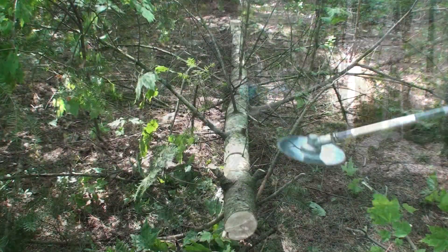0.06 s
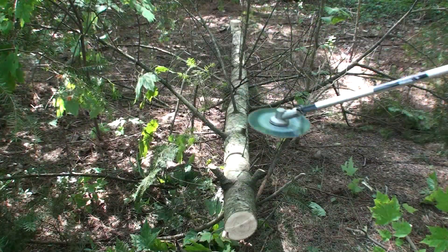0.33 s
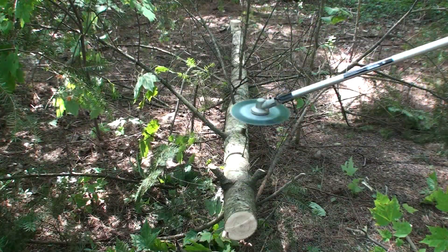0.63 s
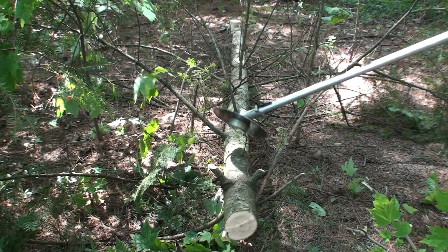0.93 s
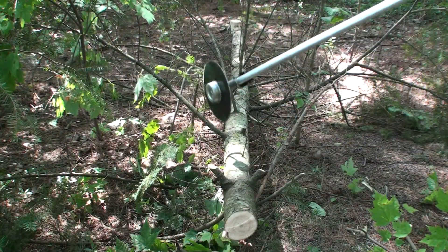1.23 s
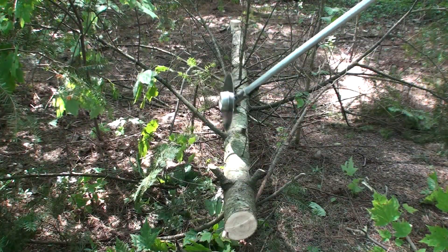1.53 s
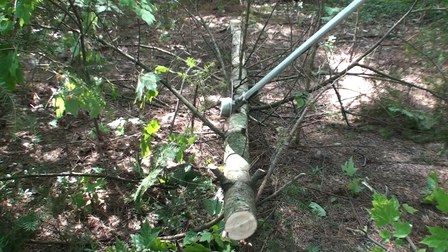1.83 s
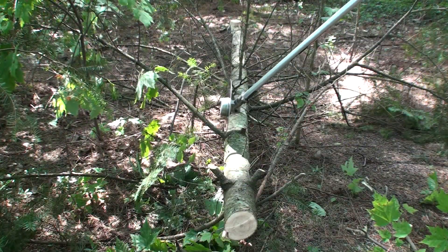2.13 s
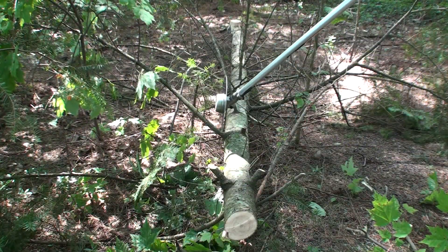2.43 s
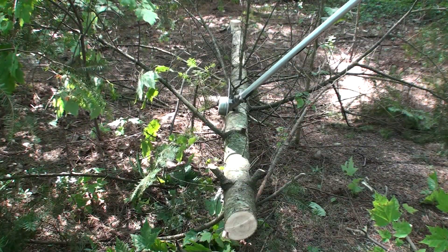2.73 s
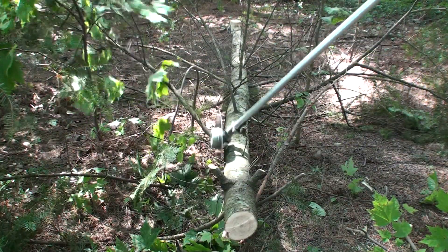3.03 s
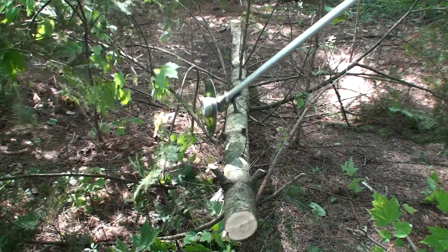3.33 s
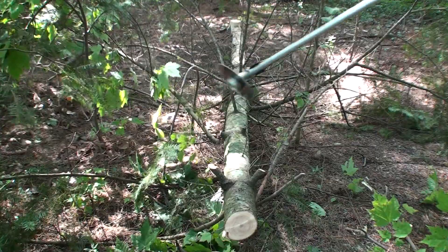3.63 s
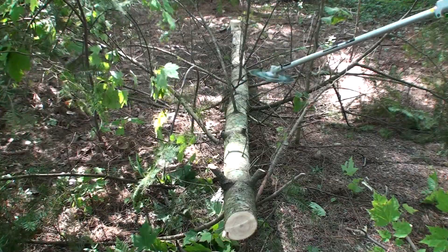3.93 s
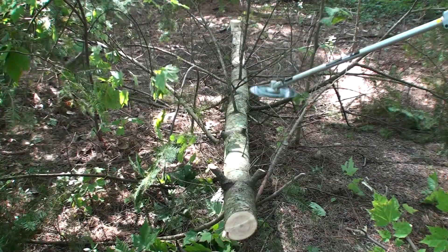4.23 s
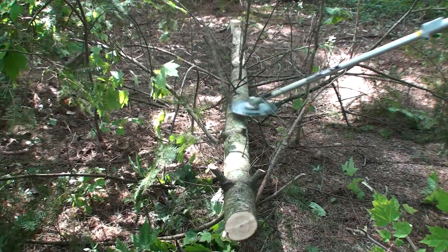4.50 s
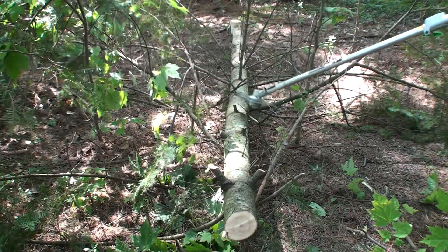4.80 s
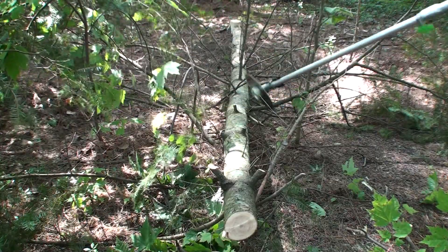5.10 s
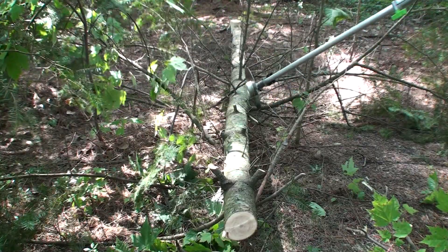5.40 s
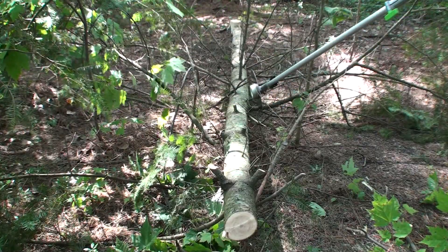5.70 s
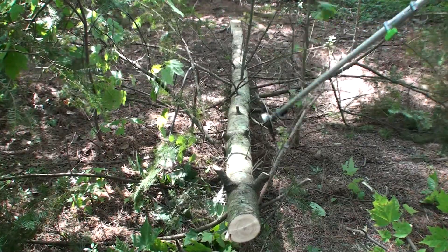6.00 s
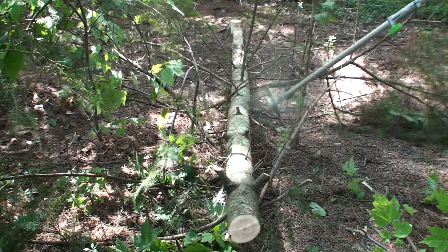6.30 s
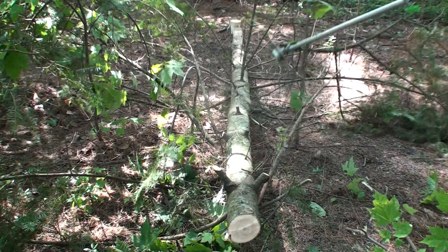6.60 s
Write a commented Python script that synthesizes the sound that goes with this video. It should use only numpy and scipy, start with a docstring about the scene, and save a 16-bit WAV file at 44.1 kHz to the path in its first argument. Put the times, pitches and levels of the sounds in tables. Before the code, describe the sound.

A cordless brushcutter runs throughout, its steel saw blade rushing and whistling over a motor and gear whine as it takes branches off a trunk outdoors. A few brief nicks come first, then the whine sags and climbs again. A harder bite follows, then a flurry of rasping cuts with snapping fibres, high squeals and metallic ringing, and a few last bites that pull the pitch down. The sound sits slightly to the right.

```python
"""Brushcutter limbing a trunk

A cordless brushcutter with a steel saw blade takes the branches off a felled trunk in a wood.
The blade rushes and whistles in the air over the whine of motor and bevel gear. At each bite the
teeth rasp through wood, fibres snap, and the disc squeals and rings on; the speed sags at some cuts.
Underneath: a faint low hum that stops part way, and a hollow drone that comes and goes."""
import sys
import numpy as np
from scipy import signal
from scipy.fft import rfft, irfft
from scipy.io import wavfile
from scipy.ndimage import uniform_filter1d, minimum_filter1d

SR = 44100
rng = np.random.default_rng(int(sys.argv[2]) if len(sys.argv) > 2 else 0)


def dump_mix(stems):
    """Bounce the given channels to the path in sys.argv[1] as a 16-bit WAV at rate SR."""
    frames = np.atleast_2d(stems).T  # one column per channel
    limited = np.clip(frames, -1, 1)  # hard clip at full scale
    pcm = np.round(limited * 32767).astype(np.int16)
    wavfile.write(sys.argv[1], SR, pcm)


N = 297660
T = np.arange(N) / SR
GEAR_RATIO, TEETH, NOMINAL_HZ = 29 / 12, 20, 280

# Motor speed: (time [s], rotation [Hz])
MOTOR_SPEED = [(0, 281.7), (1.3, 233.6), (1.5, 230.8), (1.75, 232.2), (2.04, 241.6), (2.41, 260.3),
               (2.92, 290.9), (2.99, 277), (3.2, 290.4), (3.53, 306.8), (3.8, 312.6), (4.1, 317.6),
               (4.4, 309), (4.62, 298.8), (5.2, 291.8), (5.89, 290.9), (6.01, 267.2), (6.25, 277.3),
               (6.39, 251.3), (6.75, 236.1)]
# Stereo balance of broad noise: (frequency [Hz], left minus right [dB])
BALANCE = [(60, 0), (130, -1), (260, -1), (500, -4), (1300, -5), (2400, -4), (4400, -3), (8000, 0),
           (15000, -0.3)]
# Stereo likeness of broad noise: (frequency [Hz], coherence [0..1])
COHERENCE = [(60, 0.99), (130, 1), (290, 0.97), (640, 0.89), (1410, 0.99), (3100, 0.87), (6820, 0.91),
             (15000, 0.93)]
# Air torn by the blade; colour shifts as the disc tilts: (time [s], level [dB], hiss [dB], top [dB])
RUSH_LEVELS = [(0, -35, -1, 3), (.25, -32.5, 2.5, 5.5), (.55, -30.5, 1, 4.5), (.75, -32.5, 4.5, 4),
               (.9, -32, -1, 0.5), (1.2, -32.5, 2.7, 3.5), (1.65, -33.5, 3, 3), (2.1, -33, 5, 2.5),
               (2.9, -32.5, 3.5, 4), (3.3, -32, 4, 4), (3.6, -33, 2.5, 8.5), (3.8, -29.5, -1, 1.5),
               (4.07, -30.5, -2.5, 2.5), (4.22, -37.5, -4, 12.5), (4.75, -37, .5, 3.5),
               (5.3, -36, -1.5, 2.5), (6.1, -34.5, -0.5, -1), (6.75, -35.5, -.5, -1.5)]
# Rush spectrum at nominal speed: (frequency [Hz], relative density [dB])
RUSH_SPECTRUM = [(30, -33), (100, -3), (180, -11.5), (260, -3), (450, 3.5), (1000, 7), (1400, 11.5),
                 (2000, 8.5), (2350, 8), (2900, 8), (3500, 7), (4700, 10.5), (6000, 7.5), (7500, 1),
                 (11500, -7.5), (16000, -17.5)]
# Humps in the rush at nominal speed: (centre [Hz], width [Hz], gain [dB])
RUSH_HUMPS = [(240, 22, 5.5), (1510, 100, 1.5), (1990, 104, 3.5), (2520, 160, -1.5), (3630, 110, 1.5),
              (12800, 850, 1.5)]
# Fine hiss spectrum: (frequency [Hz], relative density [dB])
HISS_SPECTRUM = [(11000, -30), (12400, -5), (13000, 3), (14000, -1), (16000, -12)]
# Drive, loudest in the gear on run-up: (time [s], motor order 1 [dB], motor order 2 [dB], gear [dB])
DRIVE_LEVELS = [(0, -38, -56, -39), (.9, -42.5, -54, -46), (1.2, -41.5, -39, -39),
                (1.45, -44.5, -45, -42.5), (2, -41.5, -42, -29.5), (3.1, -44.5, -36.5, -27),
                (3.55, -42.5, -38.5, -30.5), (4.05, -36, -62, -32.5), (4.25, -47, -55, -37),
                (5.05, -44, -44, -41.5), (5.35, -57, -47, -40.5), (6.75, -44.5, -46, -40)]
# Gear mesh and side tones: (multiple of blade speed, relative level [dB])
GEAR_ORDERS = [(1, -26), (4, -23), (6, -28), (9, -12), (12, -7), (15, -2.5), (17, -8), (27, -5), (28, -0.5),
               (29, -3), (30, -0.5), (31, -7.5), (32, -2), (33, -11), (34, -1.5), (36, -12)]
# Shaft and bearing growl: (multiple of motor speed, level re rush [dB])
SHAFT_ORDERS = [(1.37, -19), (1.655, -18.5), (2.48, -17), (2.61, -21), (2.83, -42), (3, -16.5), (5, -7),
                (6.62, -8), (7.04, -8), (7.24, -6.5)]
# Resonant motor orders: (order, resonance [Hz], width [Hz], peak re gear [dB], floor re gear [dB])
RESONANT_ORDERS = [(10, 2310, 81, 10.5, -10), (10, 2910, 37, -6, -16), (40, 10680, 250, 0, -19)]
# Teeth in wood; a light touch lets the disc ring, a deep cut damps it:
# (start [s], end [s], rasp [dB], grind re rasp [dB], ring feed gain [dB])
CUTS = [(0, .06, -19.5, -6.5, -0.5), (.183, .211, -17.5, -7, 1.5), (.997, 1.038, -26.5, -10, -1),
        (1.132, 1.136, -11, -19, 1), (2.92, 3.019, -13.5, -2.5, -2), (3.033, 3.12, -27.5, 2, -3),
        (3.154, 3.233, -22, 6, -3.5), (3.857, 3.896, -14.5, -18, 1), (3.9, 4.079, -26, -2, 0.5),
        (4.078, 4.283, -17.5, -10, 0.5), (4.31, 4.34, -14.5, -5, 2.5), (4.38, 4.442, -17, -7.5, 2),
        (4.448, 4.522, -21, -3, 2.5), (4.54, 4.612, -21, -7, 4), (4.656, 4.68, -28, -6, 4),
        (4.911, 4.964, -19.5, -2.5, -2.5), (5.134, 5.182, -16.5, -5, 2), (5.899, 5.994, -16, -4, -2),
        (6.258, 6.316, -20, 1.5, -0.5), (6.313, 6.369, -16.5, -6, 0), (6.37, 6.377, -14.5, -0.5, -5.5),
        (6.447, 6.454, -12, -5, -3), (6.47, 6.488, -17.5, 2.5, -1)]
# High rasp filter: (frequency [Hz], gain [dB])
RASP_SPECTRUM = [(300, -47), (1500, -38), (3000, -13), (5000, 0), (6500, 6), (7700, 4), (8500, 6),
                 (9700, -0.5), (11500, 1.5), (13000, -10), (16000, -10)]
# Low grind filter: (frequency [Hz], gain [dB])
GRIND_SPECTRUM = [(100, -31), (700, -54), (1150, 6.5), (1600, 13), (2250, 11.5), (3400, -0.5), (5000, -2),
                  (9000, -52)]
# Steel disc modes at nominal speed: (frequency [Hz], relative level [dB], t60 [s])
DISC_MODES = [(1114, -12, 0.18), (2180, 0, 0.23), (2600, -7, 0.26), (2736, -0.5, 0.31), (3386, 0, 0.22),
              (3730, -42, .3), (4220, 2, 0.35), (4790, -5.5, 0.45), (5144, 1, 0.4), (5255, -2, 0.73),
              (5710, -3.5, 0.46), (6150, 3.5, 0.72), (6440, -26, .4), (6740, 0.5, 0.62), (7500, -18, 0.42),
              (7810, 0.5, 0.69), (7900, -30, .5), (8290, 2.5, 0.17), (8530, 2, 0.68), (8680, -2, 0.062),
              (9190, -2, 0.39), (10170, -12, 0.15), (10730, -7.5, 0.11), (11500, -23, .25),
              (12400, -16.5, 0.18)]
# Edge tones, a high and a low note: (start [s], end [s], nominal pitch [Hz], relative level [dB])
EDGE_TONES = [(.04, 0.334, 5326, -12.5), (1.09, 1.37, 4490, -19.5), (1.45, 1.51, 4490, -15.5),
              (1.66, 1.68, 4490, -15), (2.06, 2.21, 4490, -19), (2.288, 2.639, 4495, -12.5),
              (2.751, 2.922, 4505, -20), (3.329, 3.446, 5333, -21.5), (3.545, 3.637, 5333, -14.5),
              (5.419, 5.7, 4475, -36), (5.457, 5.814, 5333, -18)]
# Rubbing wood locks onto one disc tone: (peak time [s], swell [s], pitch [Hz], peak level [dB])
SQUEAL_TONES = [(.217, .03, 8296, -21), (1.148, .016, 8170, -18.5), (2.928, .024, 2430, -17),
                (2.98, .02, 5750, -11), (3.098, .09, 1800, -16.5), (3.183, .025, 2720, -18),
                (4.026, .025, 6390, -15.5), (4.141, .045, 7770, -12), (4.22, .1, 5240, -17),
                (4.295, .1, 6320, -7), (4.33, .08, 5530, -18), (4.345, .12, 6594, -16),
                (4.37, .12, 7734, -16.5), (4.421, .032, 7500, -13), (4.444, .07, 8450, -11),
                (4.45, .02, 9249, -13.5), (4.5, .06, 3785, -16), (4.52, .057, 4580, -18),
                (4.52, 0.053, 5270, -19), (4.558, .025, 6320, -9), (4.61, 0.18, 6300, -19.5),
                (4.92, .012, 2484, -20.5), (5.168, 0.017, 2204, -20), (5.183, .027, 4260, -21),
                (5.198, 0.026, 8080, -17.5), (5.271, .07, 6230, -20.5), (5.28, .12, 6780, -19.5),
                (5.927, 0.03353, 4242, -19.5), (5.989, .054, 1114, -21), (6.015, 0.0196, 2710, -20),
                (6.026, .073, 2211, -16.5), (6.286, .026, 2194, -16), (6.296, .028, 6690, -20),
                (6.484, 0.021, 8926, -18)]
# Hollow drone: (start [s], end [s], level [dB])
DRONE_SPANS = [(3.597, 3.781, -37.5), (5.271, 5.8, -43)]


def amp(db):
    """Decibels to gain."""
    return 10 ** (np.asarray(db) / 20)


def unit_rms(x):
    """Scales to rms 1."""
    return x / np.sqrt(np.mean(x ** 2) + 1e-20)


def track(rows, t=T):
    """Table columns interpolated at times t."""
    times, *columns = np.transpose(rows)
    return [np.interp(t, times, column) for column in columns]


def at_hz(points, hz):
    """Curve interpolated over log frequency."""
    knots_hz, values = np.transpose(points)
    return np.interp(np.log(hz + 1), np.log(knots_hz + 1), values)


def colour(x, spectrum_db):
    """Filters x by a spectrum."""
    return irfft(rfft(x) * amp(at_hz(spectrum_db, np.fft.rfftfreq(N, 1 / SR))), N)


def wander(per_s):
    """Random curve, rms 1, per_s new values a second."""
    values = rng.standard_normal(8192)
    return unit_rms(np.interp(T * per_s, np.arange(len(values)), values))


def tone(hz):
    """Sine of rms 1 along a pitch curve."""
    return np.sqrt(2) * np.sin(2 * np.pi * (np.cumsum(hz) / SR + rng.random()))


def gate(t, start, end, rise_s, fall_s):
    """Linear rise around start, exponential fall after end."""
    return np.clip((t - start) / rise_s + .5, 0, 1) * np.exp(-np.maximum(t - end, 0) / fall_s)


def swell(start, end, build_db_per_s, fade_db_per_s):
    """Builds up to start, holds, fades after end."""
    return amp(-build_db_per_s * np.maximum(start - T, 0) - fade_db_per_s * np.maximum(T - end, 0))


def pan(x, left_db):
    """Mono to stereo; left_db is left minus right."""
    return x * amp([[left_db / 2], [-left_db / 2]])


def spread(x):
    """Mono to broad stereo: leans right, with a little random-phase scatter."""
    hz, _, bins = signal.stft(x, SR, nperseg=512)
    coherence = at_hz(COHERENCE, hz)[:, None]
    scatter = bins * np.exp(2j * np.pi * rng.random(bins.shape)) * np.sqrt(1 - coherence)
    lean = amp(at_hz(BALANCE, hz) / 2)[:, None]
    sides = np.array([(bins + scatter) * lean, (bins - scatter) / lean])
    return signal.istft(sides, SR, nperseg=512)[1][:, :N]


def blade_rush(motor_hz, throb=.105):
    """Rim turbulence: the spectrum slides with speed, the level throbs once a turn."""
    hz, t, noise = signal.stft(rng.standard_normal(N), SR, nperseg=1024, noverlap=768)
    body = (hz > 330) & (hz < 1050)
    hz = hz[:, None]
    level_db, hiss_db, top_db = track(RUSH_LEVELS, t)
    pace = track(MOTOR_SPEED, t)[0] / NOMINAL_HZ
    slide = pace ** .45
    humps_db = sum(db * np.exp(-.5 * ((hz / pace - f) / width) ** 2) for f, width, db in RUSH_HUMPS)
    shape = amp(at_hz(RUSH_SPECTRUM, hz / slide) + humps_db)
    shape /= np.sqrt((shape[body] ** 2).sum(0) / len(hz))
    # the disc beams its treble as it tilts
    beam_db = hiss_db * at_hz([(1100, 0), (1700, .45), (3000, .92), (4200, 1), (6200, 0)], hz)
    beam_db += top_db * at_hz([(4200, 0), (6200, 1), (9000, 1), (15000, .039)], hz)
    beam_db -= 24 * np.log10(slide) * at_hz([(3000, 0), (7000, .3)], hz)
    patches = uniform_filter1d(rng.standard_normal(noise.shape), 10, axis=0)
    patches_db = unit_rms(uniform_filter1d(patches, 10, axis=1))
    bins = noise * shape * amp(level_db + beam_db + patches_db)
    air = signal.istft(bins, SR, nperseg=1024, noverlap=768)[1][:N]
    return spread(air * (1 + throb * tone(motor_hz / GEAR_RATIO)))


def fine_hiss(gear_db, peak_db=-37):
    """High hiss that swells with the gear whine."""
    hiss = unit_rms(colour(rng.standard_normal(N), HISS_SPECTRUM))
    return pan(amp(peak_db + .86 * (gear_db - gear_db.max())) * hiss, -.5)


def drive(motor_hz, flutter=.0012, rough=.39):
    """Motor orders, bevel gear mesh and shaft growl, all on one speed."""
    first_db, second_db, gear_db = track(DRIVE_LEVELS)
    rush_db = track(RUSH_LEVELS)[0]
    hz = motor_hz * (1 + flutter * wander(50))
    motor = amp(first_db - 1) * tone(hz) + amp(second_db) * tone(2 * hz)
    mesh = sum(amp(db) * tone(order * (hz / GEAR_RATIO + .202 * wander(200))) * (1 + rough * wander(60))
               for order, db in GEAR_ORDERS)
    shaft = sum(amp(db) * tone(order * hz + 3 * wander(30)) * (1 + rough * wander(25))
                for order, db in SHAFT_ORDERS)
    return pan(motor * (1 + .14 * wander(40)) + amp(gear_db) * mesh + amp(rush_db) * shaft, -4)


def motor_overtones(motor_hz, gear_db, flutter=.00213, rough=.23):
    """High motor orders flare as the speed carries them through a resonance."""
    out = np.zeros(N)
    for order, centre_hz, width_hz, peak_db, floor_db in RESONANT_ORDERS:
        hz = order * motor_hz
        gain = amp(floor_db) + amp(peak_db) / (1 + (2 * (hz - centre_hz) / width_hz) ** 2)
        out += gain * tone(hz * (1 + flutter * wander(150))) * (1 + rough * wander(100))
    return pan(amp(gear_db) * out, -4)


def tooth_pressure():
    """Envelopes (rasp, grind) of the tooth contact, and of its feed into the disc modes."""
    contact, feed = np.zeros((2, N)), np.zeros((2, N))
    for start, end, rasp_db, grind_db, ring_db in CUTS:
        near = slice(max(int((start - .02) * SR), 0), int((end + .15) * SR))
        push = amp([[rasp_db], [rasp_db + grind_db]]) * gate(T[near], start, end, .0093, .01)
        contact[:, near] = np.maximum(contact[:, near], push)
        feed[:, near] = np.maximum(feed[:, near], push * amp(ring_db))
    return contact, feed


def damped_disc(force, pitch_ratio, width_hz=110, direct=.45):
    """Touched by wood, the disc passes the tooth force through broad modes."""
    pole = np.exp(-np.pi * width_hz / SR)
    warped_s = np.cumsum(pitch_ratio) / SR
    out = direct * force
    for hz, _, _ in DISC_MODES:
        carrier = np.exp(2j * np.pi * hz * warped_s)
        out += 2 * (carrier * signal.lfilter([1 - pole], [1, -pole], force * carrier.conj())).real
    return out


def sawing(motor_hz, rasp, grind, uneven=.15, tooth_set=.59, wobble=.14):
    """Each tooth strikes wood and tears a puff of fibres; teeth are set alternately left and right."""
    turns = np.cumsum(motor_hz * (1 + .004 * wander(200))) / GEAR_RATIO / SR
    teeth = TEETH * turns
    size = np.exp(uneven * rng.standard_normal(N))[(teeth + .5).astype(int)]
    size *= 1 + tooth_set * np.cos(np.pi * teeth)
    strikes = unit_rms(sum(np.cos(2 * np.pi * k * teeth) for k in range(1, 7)))
    tearing = unit_rms(rng.standard_normal(N) * np.exp(-(teeth % 1) / .7))
    force = size * (.5 * strikes + .84 * tearing) * (1 + wobble * np.sin(2 * np.pi * turns))
    steel = damped_disc(force, (motor_hz / NOMINAL_HZ) ** .15)
    bands = colour(steel, RASP_SPECTRUM), colour(steel, GRIND_SPECTRUM)
    # levelled: pressure sets the strength, whichever modes the tooth rate passes
    high, low = (band / np.sqrt(uniform_filter1d(band ** 2, size=1500)) for band in bands)
    return spread((amp(-1.5) * rasp * high + amp(-1) * grind * low) * amp(wander(130)))


def splinters(rasp, per_s=170, gain_db=-13):
    """Dry fibres snap in sharp little cracks while the teeth are in the wood."""
    snaps = rng.choice([-1, 1], N) * (rng.random(N) < per_s / SR)
    crack = rng.standard_normal(200) * np.exp(-np.arange(200) / 30)
    spray = colour(signal.oaconvolve(snaps, crack)[:N], [(500, -28), (1800, -1), (8000, -11), (15000, 1)])
    return pan(amp(gain_db) * rasp * unit_rms(spray), -1)


def disc_ringing(motor_hz, rasp, feed, split_hz=3800, scrape_hz=28, build_s=.0093):
    """Grind feeds the low modes, rasp the high; they rise with speed, smear on wood, then ring free."""
    pole = np.exp(-1 / (build_s * SR))
    high_db, low_db = 20 * np.log10(signal.lfilter([1 - pole], [1, -pole], feed) + 1e-9)
    touch = np.clip(rasp / amp(-16), 0, 1)
    stiffening = (motor_hz / NOMINAL_HZ) ** .17
    out = np.zeros((2, N))
    for hz, db, t60_s in DISC_MODES:
        decay_db = 60 * T / t60_s
        fed_db = low_db - 7 if hz < split_hz else high_db - 12
        held_db = np.maximum.accumulate(fed_db + 3.5 * wander(22) + decay_db) - decay_db
        ring = amp(held_db + db) * tone(hz * stiffening + scrape_hz * touch * wander(400))
        out += pan(ring * (1 + .38 * wander(90)), -.8 + 3 * rng.standard_normal())
    return out


def whistles(motor_hz, split_hz=5000, waver_hz=3.4, unsteady_db=2.5):
    """Edge tones held by the disc: they rise a little with speed and shake with the turbulence."""
    notes = {}
    for start, end, hz, db in EDGE_TONES:
        notes.setdefault(hz > split_hz, []).append((hz, amp(db) * swell(start, end, 90, 73)))
    stiffening = (motor_hz / NOMINAL_HZ) ** .185
    out = np.zeros(N)
    for rows in notes.values():
        pitches_hz, envelopes = zip(*rows)
        out += np.max(envelopes, 0) * tone(np.mean(pitches_hz) * stiffening + waver_hz * wander(250))
    return pan(amp(-1 + unsteady_db * wander(15)) * out * (1 + .045 * wander(120)), -1.6)


def hum(hz=72, level_db=-53.5, full_s=.43, end_s=4.074):
    """Low, nearly steady hum that stops part way."""
    return pan(amp(level_db) * swell(full_s, end_s, 10, 108) * tone(hz + .45 * wander(7.8)), -.4)


def squeals(swell_db=8, t60_s=.28, rough=.16, waver_hz=14):
    """Stick and slip pumps up single tones; each swells to its peak and rings out."""
    out, shake, waver = np.zeros((2, N)), wander(140), wander(260)
    for peak, swell_s, hz, db in SQUEAL_TONES:
        start = peak - swell_s
        near = slice(max(int((start - .03) * SR), 0), int((peak + .4) * SR))
        t = T[near]
        random_span = rng.integers(0, N - len(t)) + np.arange(len(t))
        envelope_db = np.interp(t, [start, peak], [-swell_db, 0]) - 60 * np.maximum(t - peak, 0) / t60_s
        onset = gate(t, start, np.inf, .0045, 1)
        rub = gate(t, start, peak, .02, .15)
        note = (1 + rough * shake[random_span]) * tone(hz + waver_hz * rub * waver[random_span])
        out[:, near] += pan(amp(db + envelope_db) * onset * note, -.8 + 1.6 * rng.standard_normal())
    return out


def drone(motor_hz, nominal_pitch_hz=386, waver_hz=7, rough=.27):
    """Hollow tone whose pitch follows the speed."""
    envelope = sum(amp(db) * swell(start, end, 59, 30) for start, end, db in DRONE_SPANS)
    hz = nominal_pitch_hz * motor_hz / NOMINAL_HZ + waver_hz * wander(50)
    return pan(envelope * tone(hz) * (1 + rough * wander(50)), -5)


def scene():
    """The machine in free air, a low hum, and the cuts."""
    motor_hz, gear_db = track(MOTOR_SPEED)[0], track(DRIVE_LEVELS)[2]
    (rasp, grind), feed = tooth_pressure()
    running = blade_rush(motor_hz) + fine_hiss(gear_db) + drive(motor_hz)
    tones = motor_overtones(motor_hz, gear_db) + whistles(motor_hz) + drone(motor_hz) + hum()
    cutting = sawing(motor_hz, rasp, grind) + splinters(rasp)
    return running + tones + cutting + disc_ringing(motor_hz, rasp, feed) + squeals()


def record(dry, limit_db=-.1, recovery_db_per_s=90, cutoff_hz=15800):
    """A fast peak limiter ducks the mix under the hardest bites and squeals; then a low-pass."""
    peak_db = 20 * np.log10(-minimum_filter1d(-abs(dry).max(0), size=100) + 1e-9)
    recovery_db = recovery_db_per_s * T
    held_db = np.maximum.accumulate(peak_db + recovery_db) - recovery_db
    limited = dry / amp(uniform_filter1d(np.maximum(held_db - limit_db, 0), size=100))
    lowpass = signal.firwin(511, cutoff_hz, window=("kaiser", 9), fs=SR)
    return signal.oaconvolve(limited, lowpass[None], "same")


dry = scene()
out = record(dry)
dump_mix(out)
```